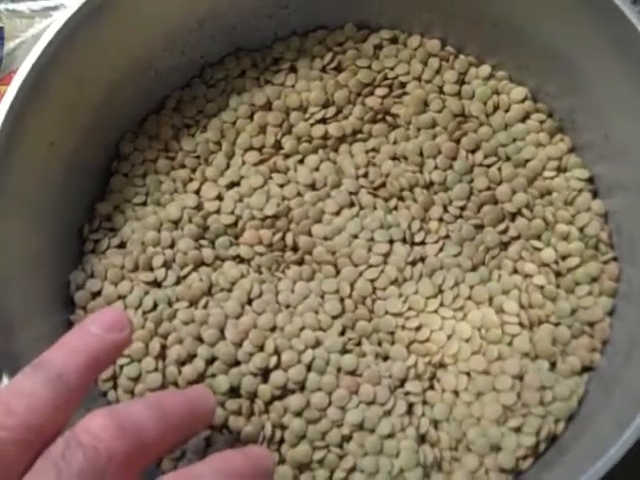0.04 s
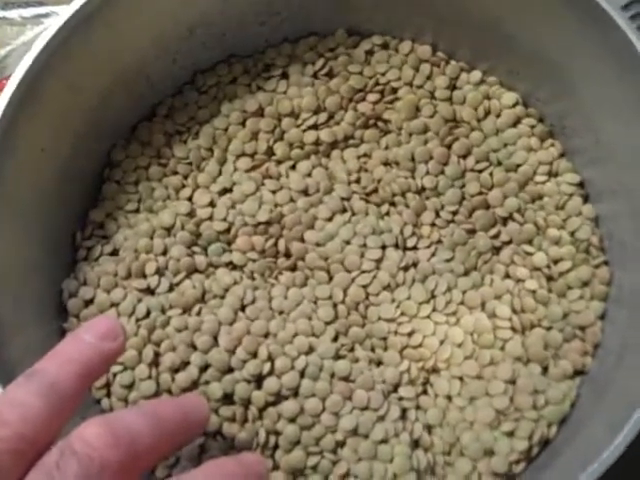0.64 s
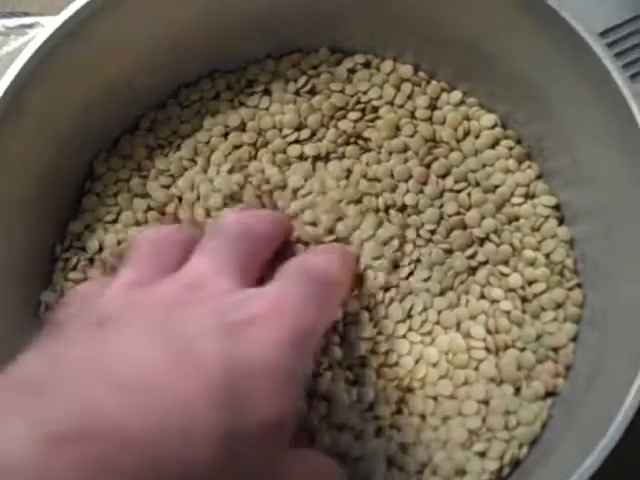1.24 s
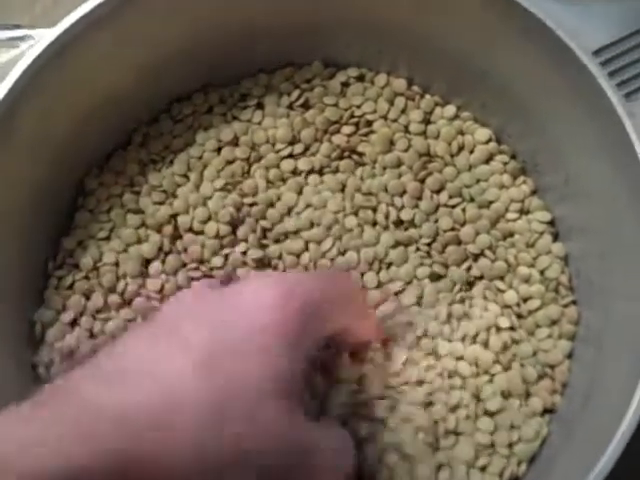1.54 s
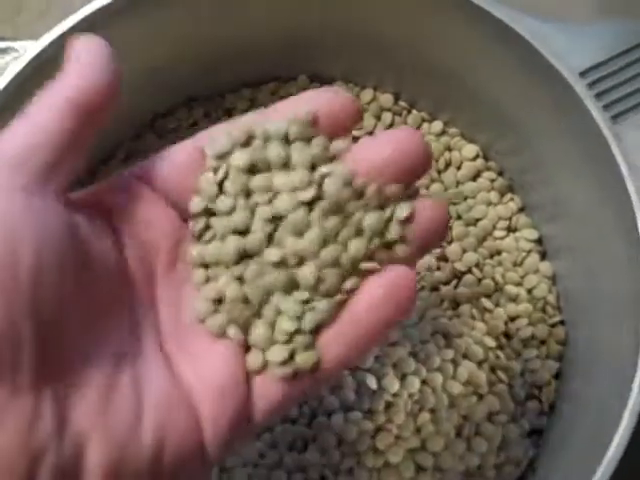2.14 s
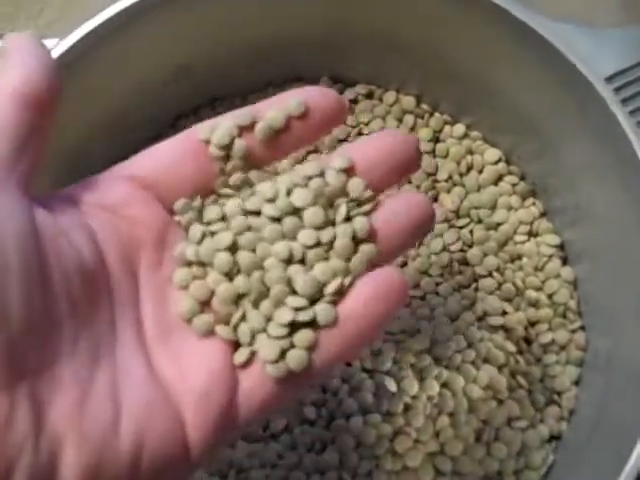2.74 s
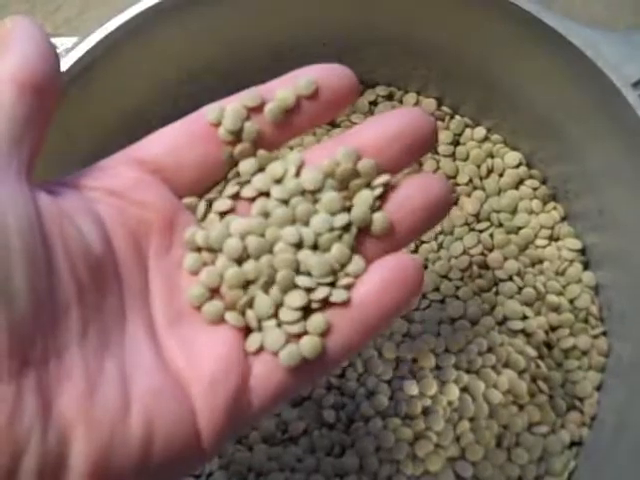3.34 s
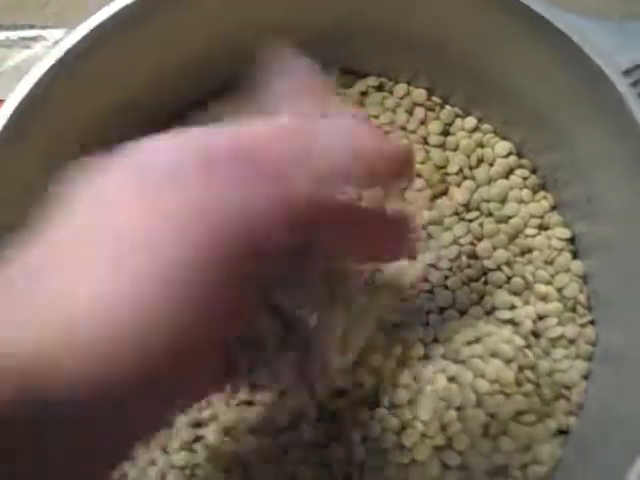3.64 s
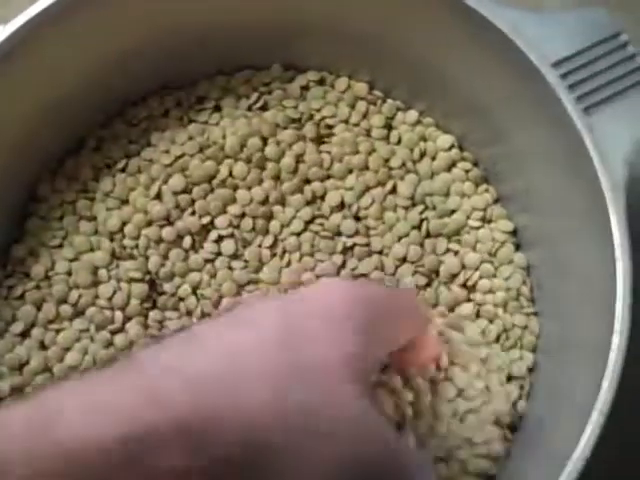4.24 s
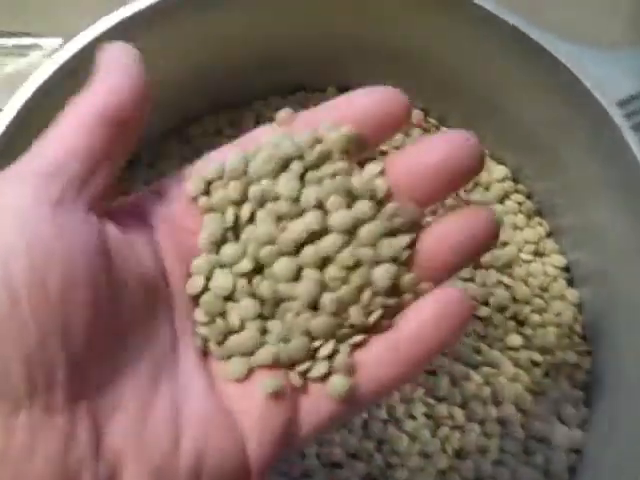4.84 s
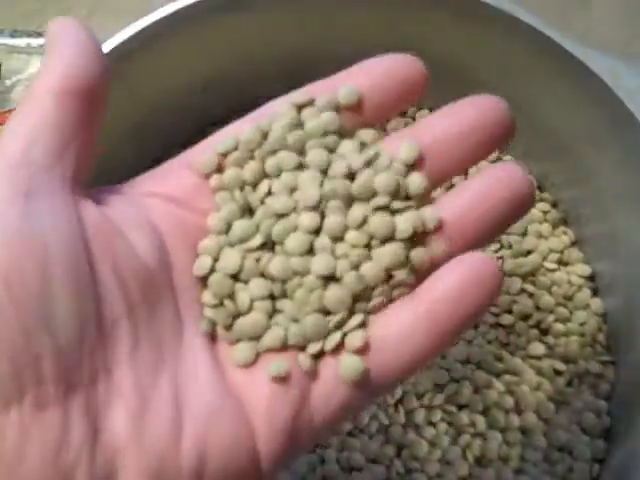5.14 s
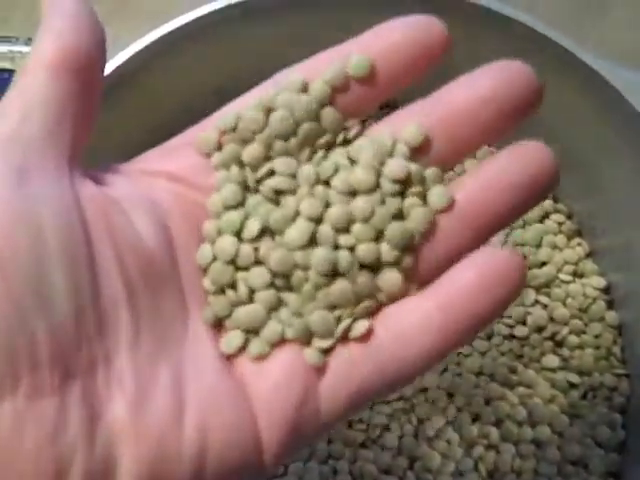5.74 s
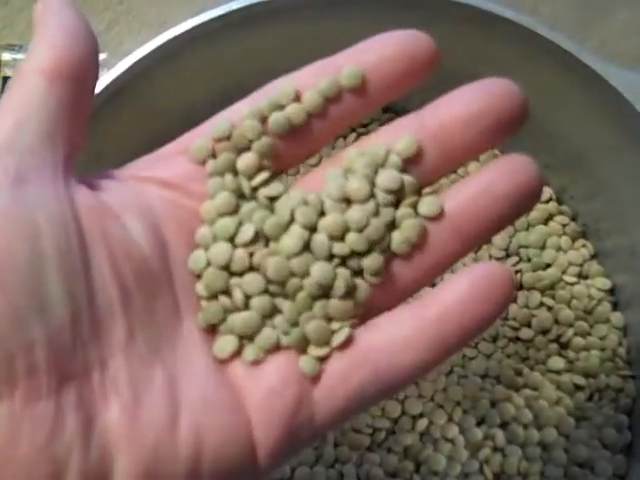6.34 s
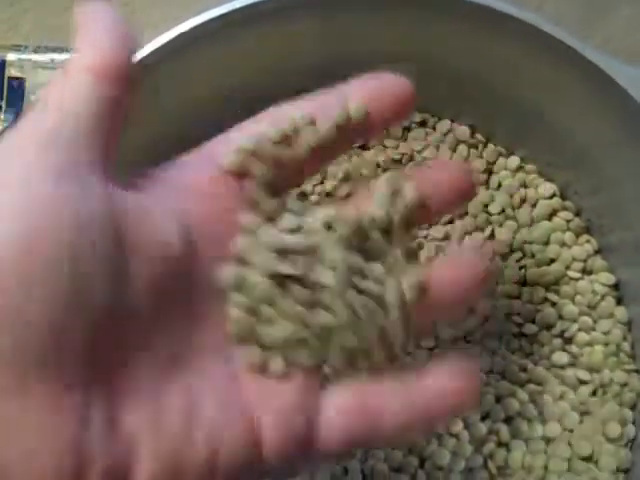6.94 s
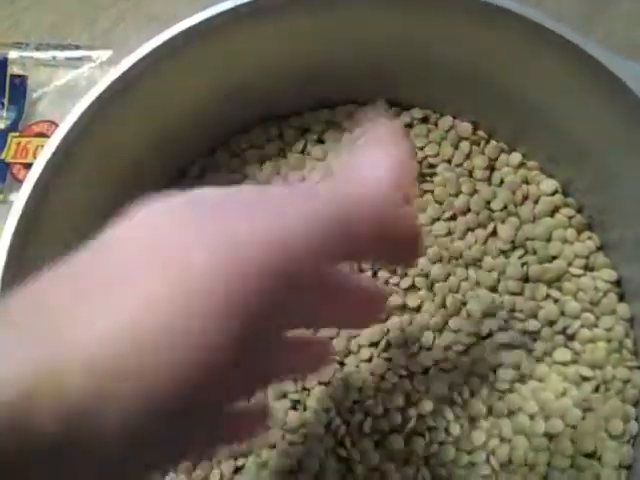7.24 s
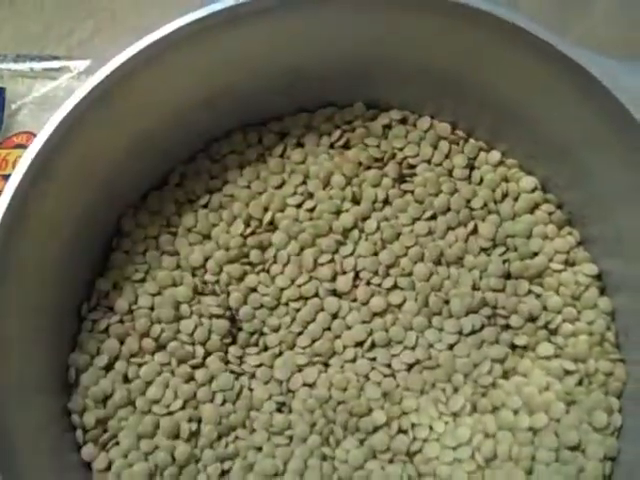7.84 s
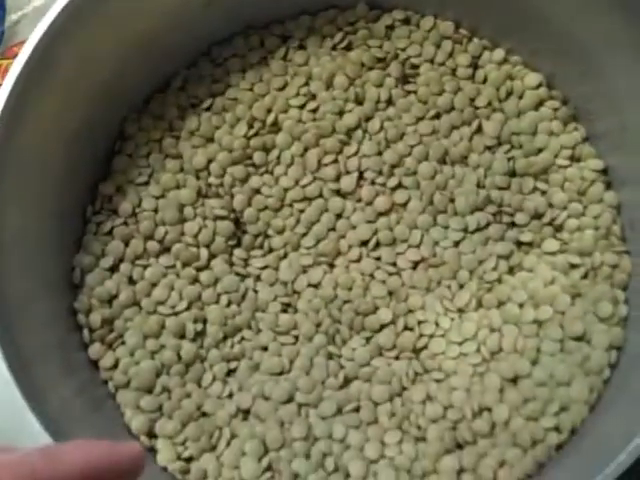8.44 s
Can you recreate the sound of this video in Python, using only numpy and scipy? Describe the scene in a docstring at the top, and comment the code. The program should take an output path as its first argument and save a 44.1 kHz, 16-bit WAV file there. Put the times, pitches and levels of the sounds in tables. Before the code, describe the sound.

A hand rakes through dry lentils in a metal pot twice, letting each handful trickle back with small clicks and a short rush.

```python
"""A hand rakes through dry lentils in a metal pot. Twice it scoops up a handful, lets it trickle back
and drops the rest in a short rush. Each contact between seeds is a tiny impact whose click scatters
inside the pot and faintly excites the modes of its wall; dense impacts merge into a noise.
An appliance hums in the quiet kitchen; near the end comes a soft bump."""
import sys
import numpy as np
from scipy import signal
from scipy.fft import rfft, irfft, next_fast_len
from scipy.io import wavfile
from scipy.ndimage import uniform_filter1d, map_coordinates

SR = 44100
rng = np.random.default_rng(int(sys.argv[2]) if len(sys.argv) > 2 else 0)


def pcm_store(signal):
    """Save signal as 16-bit PCM."""
    levels = np.round(np.clip(np.atleast_2d(signal), -1, 1) * 32767)
    wavfile.write(sys.argv[1], SR, levels.astype(np.int16).T)


N = 378245

# Mains and motor lines. Each row: frequency in Hz, level in dB.
HUM_LINES = [(59.8, -74.5), (119.7, -60.5), (143.6, -64.5), (204, -74), (239.6, -63.5), (299.6, -70),
             (359.5, -73.5), (419.4, -79.5)]
# The kitchen's reverberation. Each row: frequency in Hz, t60 in seconds.
ROOM_DECAY = [(200, 0.89), (2000, 0.48), (7500, 0.1), (14000, 0.24)]
# Spectra. Each row: frequency in Hz, relative spectral density in dB.
AIR_SPECTRUM = [(20, -9.5), (60, 1.5), (140, 3.5), (190, -3), (270, -1), (400, -11.5), (700, -15.5),
                (1500, -24), (4000, -30.5), (14000, -36.5)]  # still room
RUMBLE_SPECTRUM = [(25, -21), (60, -17), (110, 7.5), (170, -9), (280, -9.5), (500, -44.5), (1200, -74)]  # shoved heap
SLIP_SPECTRUM = [(3000, -41.5), (6200, -12), (7100, -7), (8300, -9.5), (9300, -21), (14000, -34.5)]  # creeping seeds
CLICK_SPECTRUM = [(240, -43.5), (400, -18.5), (685, -16.5), (857, -11), (1280, -20), (1530, -13.5),
                  (1750, -27), (1950, -12), (2370, -18.5), (2790, -14), (3760, -15), (5710, -7),
                  (7250, 4.5), (10100, -15), (14200, -17)]  # single seeds
POUR_SPECTRUM = [(210, -39), (350, -22), (681, -15.5), (860, -9), (1120, -16.5), (1250, -17.5),
                 (1350, -19.5), (1920, -13), (2210, -14.5), (3750, -13.5), (4880, -8), (6250, -5.5),
                 (7410, 3), (10300, -17), (14200, -19)]  # landing handful
GRIND_SPECTRUM = [(200, -53), (340, -24.5), (487, -24), (854, -16.5), (1030, -16.5), (1450, -21),
                  (1920, -12.5), (2210, -17), (3030, -8.5), (3540, -12), (5650, -1.5), (6400, -4.5),
                  (7140, 4.5), (8620, -5), (9320, -13.5), (14200, -24)]  # raked seeds
# The seeds lie to the left. Each row: frequency in Hz, left minus right level in dB.
LEFT_BIAS = [(500, 0), (2000, 1), (4500, 2), (6000, 1), (7200, 6), (8500, 11), (10500, 13), (13000, 19)]
# Damped modes. Each row: frequency in Hz, relative level in dB, t60 in seconds.
TICK_MODES = [(523, -55, 0.038), (680, -43, 0.014), (890, -55, .022), (1200, -57, 0.02)]  # a faint, dull tick
STAND_MODES = [(69, -2, .2), (87.4, -3, 0.23), (132, 0, 0.19), (168, 5, 0.07), (270, -2.5, 0.097)]  # the full pot on its stand
POT_MODES = [(733, -23, .12), (784, -20, .12), (855, -19.5, .08), (980, -21, .05), (1380, -31, .15),
             (1912, -25, .06), (2709, -31, .2), (3131, -33, .12), (3298, -31, .2), (3707, -32, .2),
             (4843, -26, .06), (5539, -23, .12), (7100, -21, .05)]  # the wall and the air inside it
BRUSHED_MODES = [(2709, -44.5, .8), (3708, -46, .55), (5626, -49, .5)]  # the wall brushed by the hand
# Soft knocks against the pot. Each row: start in seconds, relative level in dB.
POT_BUMPS = [(3.835, -34.5), (7.774, -31.5), (7.797, -32.5), (7.874, -43)]
# Envelopes. Each row: time in seconds, relative level in dB.
SETTLE_LEVELS = [(0.88, -86.5), (0.95, -67), (3.5, -65.5), (6.75, -69), (7.4, -66.5), (7.7, -69),
                 (7.93, -63), (8.0, -94.5)]  # the disturbed heap settling
SIFT_LEVELS = [
    [(2.03, -51.5), (2.35, -44.5), (2.59, -38.5), (2.68, -56), (2.76, -44), (3.0, -58.5), (3.45, -59)],
    [(4.72, -54.5), (4.9, -43.5), (5.05, -49), (5.16, -44), (5.28, -46), (5.9, -58.5), (6.6, -62)],
]  # seeds passing the fingers, one list per handful
POUR_LEVELS = [
    [(3.62, -45.5), (3.73, -40), (3.77, -30), (3.8, -26.5), (3.86, -36.5), (3.89, -78)],
    [(7.04, -50.5), (7.09, -38), (7.15, -30.5), (7.26, -31.5), (7.32, -44), (7.42, -78.5)],
]  # seeds falling back together, one list per handful
# Single seeds that land or snap past each other.
# Each row: start in seconds, relative click energy in dB, extra knock on the heap in dB.
SEED_DROPS = [(1.331, -6.5, -6), (1.916, -12, -3), (2.110, -12.5, -7.5), (2.224, -16, -1),
              (2.295, -14.5, -15), (2.409, -10, 3.5), (2.483, -8, -7), (2.526, -6.5, -4), (2.702, -8.5, -4),
              (2.790, -6, -3.5), (2.850, -7.5, -6), (2.955, -15.5, 5), (3.003, -18.5, -6.5),
              (3.044, -24, 8.5), (3.069, -15, 3.5), (3.183, -10.5, -0.5), (3.243, -10.5, 4.5),
              (3.263, -15, 3.5), (3.302, -22.5, 7.5), (3.344, -15.5, -9), (3.354, -15.5, 3.5),
              (3.617, -14, -1.5), (3.640, -11, -2), (3.965, -1, -2), (4.120, -1.5, -7), (4.297, -4, -11),
              (4.597, -10, -3.5), (4.776, -5, -10.5), (4.942, -6.5, -7.5), (5.026, -10, 6),
              (5.056, -11, -5), (5.087, -12.5, -4), (5.247, -11.5, 5.5), (5.289, -8, 2), (5.429, -8.5, -5),
              (5.617, -14, 4), (5.637, -10, 2), (5.648, -9.5, -3), (5.935, -17, 4.5), (6.073, -9.5, 2.5),
              (6.192, -13.5, -2), (6.223, -5.5, -0.5), (6.266, -10, 1.5), (6.283, -11, 4),
              (6.353, -14.5, 4), (6.407, -21, 4), (6.608, -19.5, 11), (6.846, -18.5, 6), (6.859, -14, 4),
              (6.895, -13.5, -4), (6.970, -15, 8), (7.001, -19.5, -1.5), (7.020, -22.5, 4),
              (7.047, -13, 2.5), (7.069, -12, 4)]
# Clumps that slide off the fingers seed by seed. Each row: start in seconds, length in seconds,
# seeds per second, relative click energy in dB, extra knock on the heap in dB.
SEED_CLUMPS = [(1.962, .37, 40, -19.5, 0.5), (2.061, .017, 163, -17, -6.5), (2.348, .025, 100, -11.5, -4),
               (2.423, .095, 82, -12.5, 0), (2.549, .11, 87, -13.5, -1.5), (2.719, .057, 135, -13, -0.5),
               (2.893, .025, 126, -22.5, 9.5), (3.146, .052, 81, -18.5, 2), (4.688, .021, 126, -12, -3),
               (4.743, .125, 95, -18, -6), (4.887, .035, 74, -11.5, 0), (4.954, .032, 110, -15.5, -1.5),
               (5.107, .088, 107, -12.5, 3), (5.335, .08, 92, -12.5, 3.5), (5.452, .095, 58, -15, 3),
               (5.688, .042, 56, -17.5, 6), (5.765, .074, 71.4, -15.5, 4.5), (5.893, .022, 147, -17, 1.5),
               (6.013, .036, 104, -10.5, 2.5), (6.084, .035, 93, -14.5, 3), (6.302, .018, 132, -14.5, 2.5),
               (6.482, .031, 87, -17.5, 2)]
# The heap barely stirred, by a fingertip and later by the bump.
# Each row: peak time in seconds, relative level in dB, rise in seconds, fade in dB per second.
LIGHT_STIRS = [(0.96, -66, 0.056, 44.5), (7.781, -57.5, 0.019, 120)]
# Two digs through the heap, one list each.
# Each row: time in seconds, relative level in dB, body below about 3 kHz against the treble in dB.
DIGS = [
    [(1.21, -66, -11), (1.255, -42.5, -6), (1.37, -40.5, -10), (1.48, -33.5, -6.5), (1.57, -30, -11),
     (1.63, -32, -15), (1.77, -42, -11), (1.91, -41.5, -14), (2.05, -53, -12)],
    [(3.86, -41, -8.5), (3.92, -41, -8.5), (3.99, -34, -7), (4.12, -30.5, -9.5), (4.24, -36.5, -14.5),
     (4.32, -32.5, -17.5), (4.5, -36, -17), (4.71, -40.5, -14), (4.74, -48, -11.5)],
]


def amp(db):
    """Decibels to amplitude ratio."""
    return 10 ** (np.asarray(db) / 20)


def unit(x):
    """Normalisation to rms 1."""
    return x / np.sqrt(np.mean(x ** 2) + 1e-20)


def unit_energy(x):
    """Normalisation of each channel to energy 1."""
    return x / np.linalg.norm(x, axis=-1, keepdims=True)


def along(points, hz):
    """Interpolation of (Hz, value) points on a log frequency axis."""
    knot_hz, values = np.transpose(points)
    return np.interp(np.log(hz + 1), np.log(knot_hz + 1), values)


def envelope(tables):
    """Amplitude envelope from lists of (seconds, dB) rows, silent outside them."""
    t = np.arange(N) / SR
    gain = sum(amp(np.interp(t, *np.transpose(rows)[:2])) * (t >= rows[0][0]) * (t <= rows[-1][0])
               for rows in tables)
    return np.abs(uniform_filter1d(gain, size=256))


def wobble(rate):
    """Smooth random modulation with `rate` knots a second."""
    knots = rng.standard_normal(int(N * rate / SR) + 4)
    return map_coordinates(knots, [np.arange(N) * rate / SR], order=2)


def noise(spectrum, side_db):
    """Coloured stereo noise of rms 1; a weaker side signal makes the channels more coherent."""
    size = next_fast_len(N + 8192)
    colour = amp(along(spectrum, np.fft.rfftfreq(size, 1 / SR)))
    mid, side = irfft(rfft(rng.standard_normal((2, size))) * colour, size)[:, :N]
    return unit(mid + amp(side_db) * np.array([side, -side]))


def struck(modes, start_s, attack_s):
    """Free vibration: each mode is an exponentially damped sinusoid."""
    age = np.maximum(np.arange(N) / SR - start_s, 0)
    ring = sum(amp(db - 60 * age / t60) * np.sin(2 * np.pi * hz * age) for hz, db, t60 in modes)
    return (1 - np.exp(-age / attack_s)) * ring


def background():
    """An appliance's slightly unsteady line spectrum lies over the broadband noise of the room."""
    t = np.arange(N) / SR
    hum = sum(amp(db + .5 * wobble(2)) * np.sin(2 * np.pi * (hz * t + rng.random()) + .1 * wobble(2))
              for hz, db in HUM_LINES)
    hiss = amp(-71.5) * noise([(200, -41.5), (1000, 5.5), (14000, -3.5)], side_db=2.2)
    air = amp(-60) * noise(AIR_SPECTRUM, side_db=-5)
    return (np.sqrt(2) * hum + air + hiss) * amp([[-.7], [.7]])


def kitchen_reverb(x):
    """Diffuse reverberation: convolution with noise that decays at its own rate in each band."""
    hz, t, bands = signal.stft(rng.standard_normal((2, SR // 2)), SR, nperseg=256)
    decay = amp(-60 * t / along(ROOM_DECAY, hz)[:, None])
    tail = signal.istft(bands * decay, SR, nperseg=256)[1]
    return signal.oaconvolve(x, unit_energy(tail), axes=1)[:, :N]


def dull_tick():
    """Heavily damped modes give one faint tick before the hand moves."""
    return struck(TICK_MODES, start_s=.688, attack_s=.001)


def bumps():
    """Soft impacts excite the low modes of the pot on its stand."""
    rocking = sum(amp(db - 8.0) * struck(STAND_MODES, s, attack_s=0.0054) for s, db in POT_BUMPS)
    return signal.sosfilt(signal.butter(2, 50, "high", fs=SR, output="sos"), rocking + 1e-20)


def depth_db(surface_body_db=-13.5):
    """Spectral balance follows depth: deeper digging has more body than grinding at the surface."""
    s, _, body_db = np.concatenate(DIGS).T
    return np.interp(np.arange(N) / SR, s, body_db) - surface_body_db


def heap_rumble(shove_db=-19, lurch_db=2.5, push_hz=56, push_db=-40.0, push_t60=0.28):
    """Forced vibration: the heap rumbles with force and depth; the plunging hand adds one low push."""
    push = struck([(push_hz, push_db, push_t60)], start_s=3.845, attack_s=0.0052)
    shove = envelope(DIGS) * amp(shove_db + depth_db() + lurch_db * wobble(17))
    return push + shove * noise(RUMBLE_SPECTRUM, side_db=-12.0)


def brushed_wall():
    """Lightly damped modes of the wall sing on after the hand brushes it."""
    return struck(BRUSHED_MODES, start_s=4.41, attack_s=0.01)


def click(spectrum, pitch, ripple_db, size=1024):
    """An impact is a minimum-phase pulse; smaller seeds ring higher, each with its own resonances."""
    hz = np.fft.rfftfreq(size, 1 / SR)
    balance = amp(np.outer([1, -1], along(LEFT_BIAS, hz)) / 2)
    shifted_hz = np.where(hz < 11000, hz / pitch, hz)
    ripple = unit(uniform_filter1d(rng.standard_normal(len(hz)), size=12)) * (hz > 3000)
    gain = amp(along(spectrum, shifted_hz) + ripple_db * ripple) * balance / balance.mean(0)
    # folding the cepstrum makes the pulse causal
    cepstrum = irfft(np.log(np.maximum(gain, 1e-4)))
    cepstrum[:, 1:size // 2] *= 2
    cepstrum[:, size // 2 + 1:] = 0
    pulse = irfft(np.exp(rfft(cepstrum)))
    return pulse / np.linalg.norm(pulse.mean(0))


def pot_response(echo_db, ring_db, t60=0.015, lag_spread_s=.00004, left_late_s=.000022, paths=60):
    """The impulse response of one spot in the pot: direct sound, wall reflections and modal ringing."""
    t = np.arange(SR // 5) / SR
    delay = np.append(.0002, rng.uniform(.0006, .025, paths))
    reflections = unit_energy(rng.standard_normal(paths) * amp(-60 * delay[1:] / t60))
    gain = np.append(1, amp(echo_db) * reflections)
    # each path has its own direction, hence its own lag between the channels
    lag = lag_spread_s * rng.standard_normal(paths + 1) * np.append(.35, np.ones(paths)) - left_late_s
    arrival = (delay + np.outer([-.5, .5], lag)) * SR
    echo = np.zeros((2, len(t)))
    echo[:, :SR // 32] = gain @ np.sinc(np.arange(SR // 32) - arrival[:, :, None])
    ring = 0
    for hz, db, mode_t60 in POT_MODES:
        mode = unit_energy(np.sin(2 * np.pi * hz * t) * amp(-60 * t / mode_t60))
        ring += rng.choice([-1, 1]) * amp(db) * mode
    return echo + amp(ring_db) * ring


def radiate(at, strength, knock_db, spectrum, echo_db, ring_db, pitch_spread, spots, ripple_db=0):
    """Superposition of impacts at samples `at` over spots in the pot; knock_db weights their low band."""
    out = np.zeros((2, N))
    spot_of = rng.integers(spots, size=N)[at // 64]
    low, high = (signal.butter(3, 3200, kind, fs=SR, output="sos") for kind in ("low", "high"))
    knock_strength = strength * amp(knock_db)
    for spot in range(spots):
        here = spot_of == spot
        snap = signal.sosfilt(high, np.bincount(at[here], strength[here], N) + 1e-20)
        knock = signal.sosfilt(low, np.bincount(at[here], knock_strength[here], N) + 1e-20)
        pitch = np.exp(pitch_spread * rng.normal())
        pulse = click(spectrum, pitch, ripple_db)
        response = signal.fftconvolve(pulse, pot_response(echo_db, ring_db), axes=1)
        out += signal.oaconvolve((snap + knock)[None], response, axes=1)[:, :N]
    return out


def swarm(gain, rate, crowding, scatter_db):
    """Shot noise of rms `gain`: faster motion makes more contacts (`rate` a second at -35 dB)."""
    chance = np.clip(rate / SR * (gain / amp(-35)) ** crowding, 1e-6, .5)
    at = np.flatnonzero(rng.random(N) < chance)
    size_db = scatter_db * np.clip(rng.standard_normal(N), -2, 2)
    size = unit(amp(size_db)) * rng.choice([-1, 1], N)
    return at, (size * gain / np.sqrt(chance))[at]


def settling():
    """Granular creep: countless tiny slips make a thin hiss at the seeds' own pitch."""
    at, strength = swarm(envelope([SETTLE_LEVELS]) * amp(-6.5), rate=6600, crowding=0.087, scatter_db=7.5)
    return radiate(at, strength, knock_db=0, spectrum=SLIP_SPECTRUM,
                   echo_db=-3.5, ring_db=0, pitch_spread=.01, spots=3)


def sifting():
    """Granular flow: faint clusters of seeds slip through the fingers, thinning as the hand empties."""
    flow = envelope(SIFT_LEVELS) * amp(-7.0 + 3 * wobble(40))
    at, strength = swarm(flow, rate=4900, crowding=.6, scatter_db=5.5)
    return radiate(at, strength, knock_db=5, spectrum=CLICK_SPECTRUM,
                   echo_db=-4, ring_db=-4.5, pitch_spread=0.043, spots=8, ripple_db=3.5)


def clump_seeds(jitter=.3, scatter_db=2.6, most_seeds=32):
    """Quasi-periodic release: a clump sheds seeds at uneven gaps; the sharper snaps knock less."""
    seeds, turn = [], np.arange(most_seeds)
    for start, length, rate, db, knock_db in SEED_CLUMPS:
        late, size = np.clip(rng.standard_normal((2, most_seeds)), -2, 2)
        s = start + (turn + jitter * late * (turn > 0)) / rate
        size_db = scatter_db * size
        seeds.append(np.column_stack([s, db + size_db, knock_db - size_db])[turn < length * rate])
    return np.concatenate(seeds)


def trickle(hop_s=.0035, first_hop_db=-8.0, loss_db=3, bounce=0.59, hops=4):
    """Inelastic impact: seed on seed snaps; a seed that knocks on the heap skips on, ever more weakly."""
    s, db, knock_db = np.vstack([SEED_DROPS, clump_seeds()]).T
    hop_delays = hop_s * np.cumsum(rng.uniform(.2, 1.8, (len(s), hops)), axis=1)
    rebound_db = db + first_hop_db + bounce * np.clip(knock_db, -10, 5)
    hop_db = rebound_db[:, None] - loss_db * np.arange(hops) + 0.45 * rng.standard_normal((len(s), hops))
    strength = amp(np.column_stack([db, hop_db]) - 2.79).ravel()
    times = np.column_stack([s, s[:, None] + hop_delays])
    at = np.clip(times * SR, 0, N - 1).astype(int).ravel()
    return radiate(at, strength, knock_db=np.repeat(knock_db, hops + 1) + 0.24, spectrum=CLICK_SPECTRUM,
                   echo_db=-2.5, ring_db=-3.0, pitch_spread=0.064, spots=24, ripple_db=3)


def pouring():
    """Impacts fuse as their rate rises: the rest of each handful lands, a patter thickening to a rush."""
    flow = envelope(POUR_LEVELS) * amp(-3.5 + 0.68 * wobble(70))
    at, strength = swarm(flow, rate=2900, crowding=0.74, scatter_db=3.0)
    return radiate(at, strength, knock_db=0, spectrum=POUR_SPECTRUM,
                   echo_db=1.5, ring_db=-8, pitch_spread=0.0367, spots=16)


def stir_envelope():
    """Relaxation: each light stir rises quickly and dies away exponentially."""
    t = np.arange(N) / SR
    return sum(np.clip(1 + (t - s) / rise, 0, 1) * amp(db - fade * np.maximum(t - s, 0))
               for s, db, rise, fade in LIGHT_STIRS)


def raking():
    """Granular shear: fingers force seeds past each other in small avalanches, fuller when deeper."""
    effort = (envelope(DIGS) + stir_envelope()) * amp(-3.5 + 1.3 * wobble(70))
    at, strength = swarm(effort, rate=5500, crowding=0.39, scatter_db=4.0)
    return radiate(at, strength, knock_db=depth_db()[at], spectrum=GRIND_SPECTRUM,
                   echo_db=-1.0, ring_db=0.5, pitch_spread=0.0254, spots=10)


def scene():
    """Direct and reverberant sound add: the lentils close by, the kitchen behind them."""
    seeds = raking() + pouring() + trickle() + sifting() + settling() + brushed_wall()
    return seeds + amp(-8.5) * kitchen_reverb(seeds) + bumps() + heap_rumble() + dull_tick() + background()


def record(dry, top_hz=14300):
    """Band limiting: an ideal low-pass filter passes nothing above top_hz."""
    size = next_fast_len(N + 8192)
    passband = np.fft.rfftfreq(size, 1 / SR) < top_hz
    return irfft(rfft(dry, size) * passband, size)[:, :N]


dry = scene()
out = record(dry)
pcm_store(out)
```